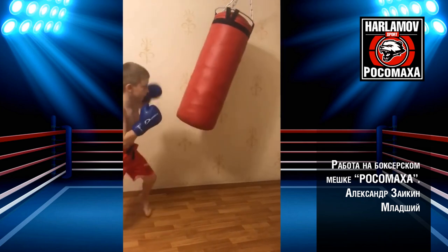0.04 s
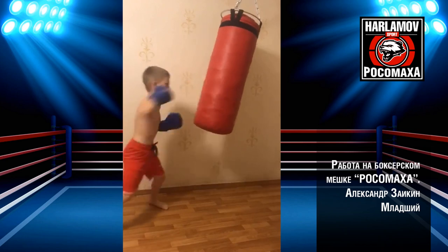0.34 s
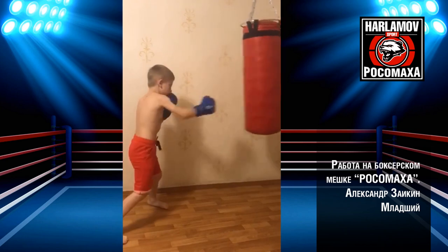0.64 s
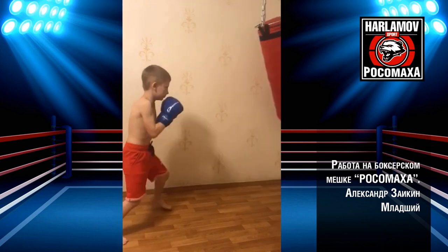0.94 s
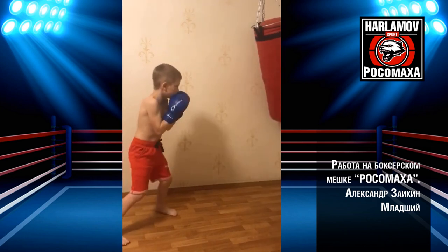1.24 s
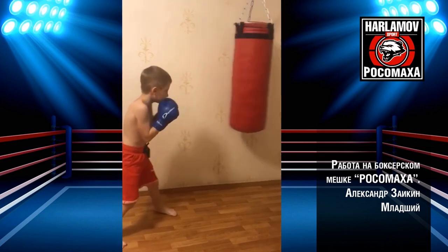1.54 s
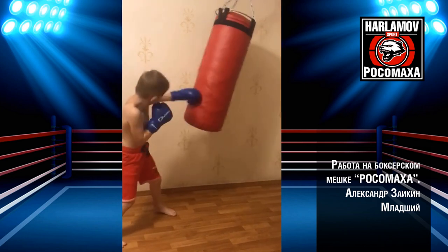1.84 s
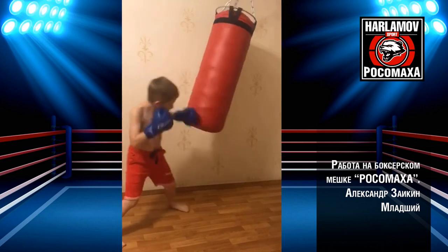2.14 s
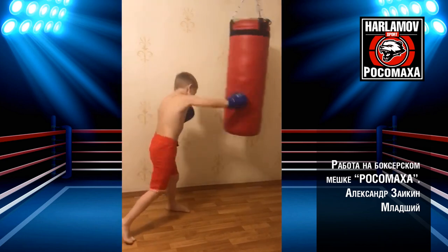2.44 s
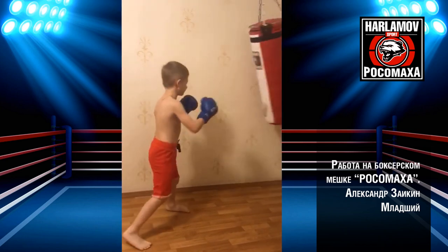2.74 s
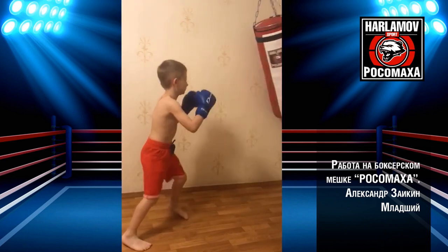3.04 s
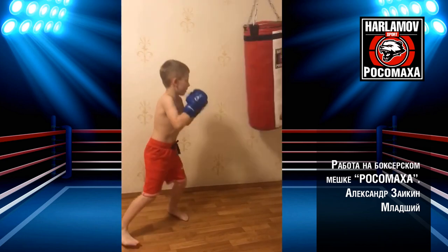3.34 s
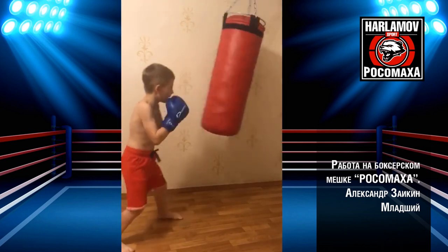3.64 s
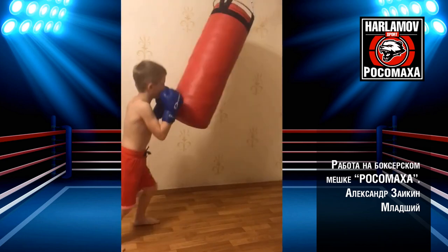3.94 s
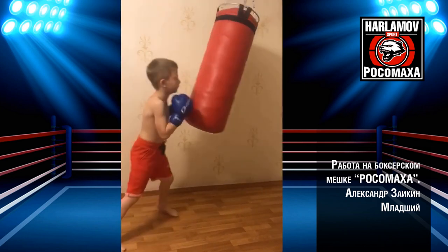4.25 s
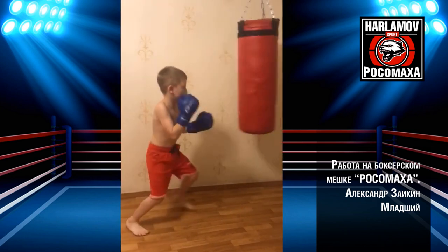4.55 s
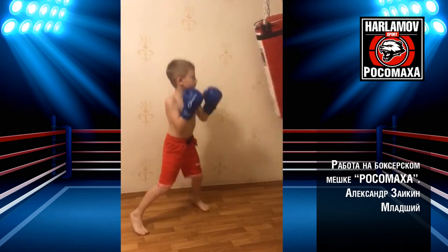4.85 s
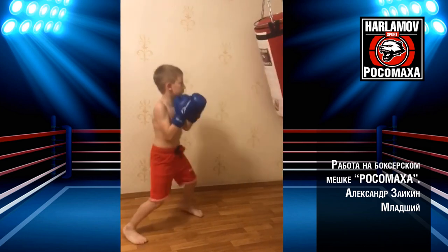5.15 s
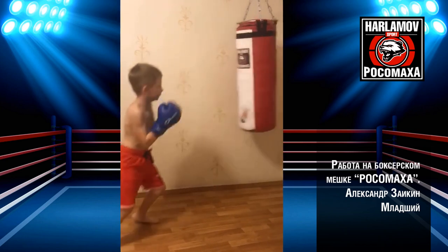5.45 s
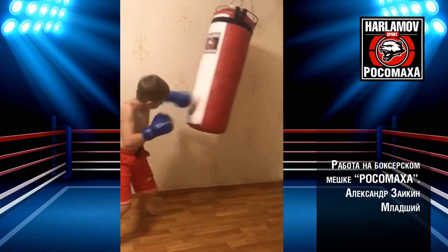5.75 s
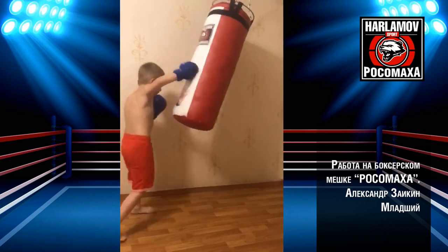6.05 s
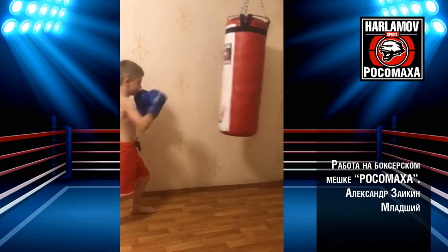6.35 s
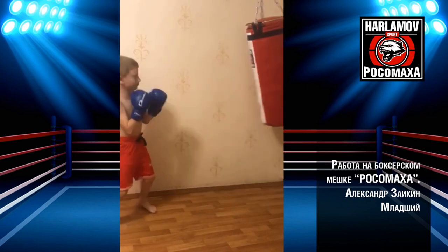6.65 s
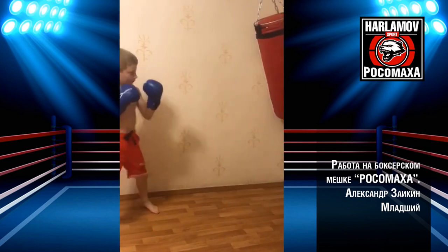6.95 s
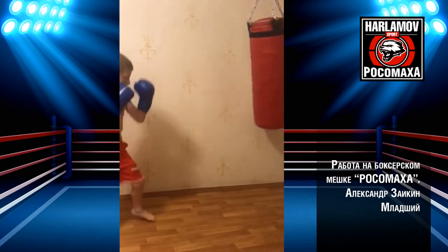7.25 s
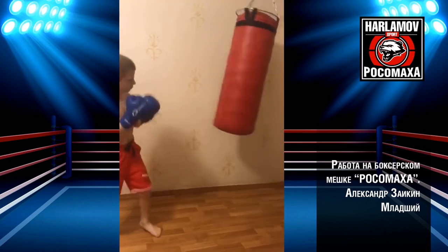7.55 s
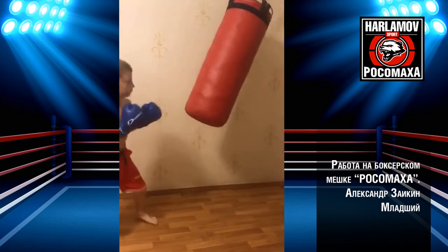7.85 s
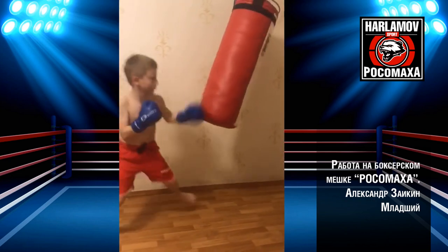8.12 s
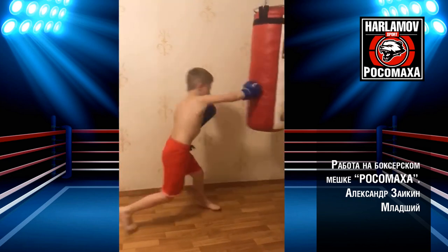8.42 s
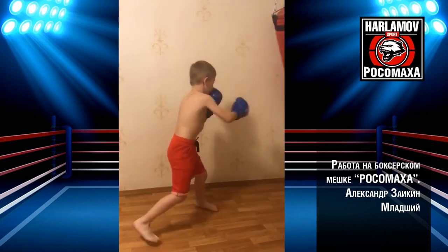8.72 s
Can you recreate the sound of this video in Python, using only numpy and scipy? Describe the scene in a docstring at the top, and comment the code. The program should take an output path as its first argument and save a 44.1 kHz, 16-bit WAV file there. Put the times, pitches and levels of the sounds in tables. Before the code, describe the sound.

A bare foot thuds on a wooden floor, and two boxing glove punches hit a hanging heavy bag at about 0.3 and 0.5 seconds. Each is a crisp vinyl smack with a padded pop and a low thump. After soft steps and scuffs, three more punches land between 1.9 and 2.5 seconds. From about 3 to 5.5 seconds there is quieter footwork: soles thud and slide on the boards, gloves rub the cover, and the hanger lightly ticks and creaks. Two punches land around 6 seconds with a brushing scrape. The heaviest steps begin just after 7 seconds, giving the floor a low boom, and continue around a last pair of punches at about 8.2 and 8.5 seconds. The microphone is a few steps away in a small room with short reverberation and a faint steady hush.

```python
"""Boxing gloves hit a hanging heavy bag in a small room with a wooden floor.
A bare foot lands and two punches follow, then three more: in each the vinyl cracks, the glove padding
pops and a thump swells in the low modes of bag and room. From about 3 s feet thud and slide on the
boards and set the room booming, while gloves rub on the cover and the hanger ticks and creaks.
Two punches land near 6 s; the heaviest steps come after 7 s, and a last pair of punches after 8 s."""
import sys
import numpy as np
from scipy import signal
from scipy.fft import rfft, irfft
from scipy.io import wavfile
from scipy.ndimage import uniform_filter1d

SR = 44100
rng = np.random.default_rng(int(sys.argv[2]) if len(sys.argv) > 2 else 0)


def output_pcm(signal):
    """Save a mono or channel-first signal as 16-bit PCM at the path in sys.argv[1].

    Samples are clipped to [-1, 1] before scaling.
    """
    pcm = np.clip(np.atleast_2d(signal).T, -1, 1) * 32767
    wavfile.write(sys.argv[1], SR, np.round(pcm).astype(np.int16))


N = 387198
AGE = np.arange(int(SR * .7)) / SR  # seconds since the start of one short sound

# Footfalls. Each row: start in seconds, levels of thud, heel knock and room boom in dB,
# decay time of the boards in seconds.
FOOTFALLS = [(0.002, -41.5, -52, -34, .03), (0.378, -52, -37.5, -58, 0.023),
             (0.979, -52.5, -80, -71, 0.045), (1.139, -51.5, -63, -50, .03),
             (1.598, -56, -78, -52.5, 0.051), (2.769, -40.5, -72, -43, 0.035),
             (3.6, -45.5, -62, -49, 0.018), (3.75, -56, -62.5, -68, 0.042),
             (4.05, -41.5, -56, -41.5, 0.028), (4.345, -54, -61, -52.5, 0.047),
             (4.573, -42.5, -54.5, -49, 0.022), (4.74, -36, -45.5, -55, 0.043),
             (5.139, -38, -59, -40.5, 0.04), (5.36, -56, -59, -57, 0.053), (5.512, -41.5, -77, -40, 0.062),
             (6.409, -48, -53, -57, 0.014), (6.746, -56.5, -61, -56, 0.022),
             (7.119, -27, -42.5, -33, 0.032), (7.44, -49.5, -60, -47.5, .035),
             (7.577, -33, -44.5, -44, 0.033), (7.878, -44.5, -52.5, -54, 0.039),
             (8.114, -46, -52, -58, 0.024), (8.241, -26.5, -39.5, -33.5, 0.011),
             (8.348, -26.5, -35.5, -38, 0.021), (8.384, -26, -63, -44, 0.05), (8.642, -27, -50, -35, 0.03)]
# Spectra of cracking vinyl and of high, middle and low friction noise.
# Each row: frequency in Hz, spectral density in dB.
CRACK_SPECTRUM = [(700, -14), (1500, 2), (3000, -2.5), (5000, -7.5), (8000, -8), (10000, -7.5),
                  (12000, -15.5)]
HISS_SPECTRUM = [(2000, -1.5), (4000, 2), (6000, -0.5), (8500, -3.5), (12000, -7)]
SCRAPE_SPECTRUM = [(450, -27.5), (900, -3.5), (1800, -6), (3400, -5), (5500, -10.5)]
RUSTLE_SPECTRUM = [(100, 1), (190, -19), (350, -5), (650, -10.5), (1200, -35)]


def punches(filling_db=-7):
    """Impact excitation: vinyl cracks, air pops out of the glove padding and the filling thumps."""
    # Each row: start in seconds, crack level in dB, its tilt in dB per octave, smack level in dB, pop
    # pitch in Hz, pop and thump levels in dB, crumple time in seconds, crumple in dB relative to the slap.
    blows = [(0.3253, -34.5, 3, -34, 276, -38.5, -35, 0.01, -17),
             (0.5386, -27, 1, -27, 383, -28, -28, 0.0039, -4.5),
             (1.8781, -29.5, -0.5, -28.5, 372, -40.5, -36.5, 0.00073, -7),
             (2.1932, -38.5, 0, -38, 345, -37, -41.5, 0.005, -2.5),
             (2.4654, -26.5, -1, -24.5, 342, -29, -26, 0.0047, -19),
             (5.8738, -30.5, -0.5, -32.5, 277, -35, -34.5, 0.0088, 1),
             (6.0946, -35, -1.5, -33, 277, -25, -34, 0.0097, 31),
             (8.167, -33, 2.5, -34.5, 250.5, -43, -34.5, 0.0045, 0.5),
             (8.5112, -25, 1, -25.5, 383, -35.5, -27.5, 0.0029, -7)]
    # Modes of the padding. Each row: multiple of the pop pitch, level in dB, decay time in seconds.
    glove_modes = [(0.692, -11, 0.0051), (1, 6, 0.0056), (1.4, -13, 0.017)]
    # The smack and the shifting filling. Each row: frequency in Hz, spectral density in dB.
    smack_spectrum = [(200, -1), (400, 3), (800, -1.5), (1500, 0.5), (2500, -38), (5000, -15.5)]
    filling_spectrum = [(35, -1), (60, 8), (110, 0.5), (200, -5.5), (300, -11.5)]
    out = np.zeros(N)
    for start, crack_db, tilt_db, smack_db, pop_hz, pop_db, thump_db, crumple_s, crumple_db in blows:
        slap = contact(crumple_s, crumple_db, wet_db=1.5)
        add_at_level(out, start, crack_db, colour(slap, tilted(CRACK_SPECTRUM, tilt_db)))
        add_at_level(out, start, smack_db, colour(slap, smack_spectrum))
        pop = sum(from_db(db) * np.sin(2 * np.pi * pop_hz * ratio * AGE) * np.exp(-AGE / decay_s)
                  for ratio, db, decay_s in glove_modes)
        add_at_level(out, start, pop_db, through_room(pop, wet_db=0, echo_share=0.17))
        add_at_level(out, start, thump_db, low_modes(swell_s=0.012, lag_s=0.0025))
        filling = colour(diffuse_tail(build_s=0.0064), filling_spectrum)
        add_at_level(out, start, thump_db + filling_db, filling)
    return out


def low_modes(swell_s, lag_s):
    """Modal resonance: bag and room take up a slow push, so their low modes swell after the impact."""
    # Each row: frequency in Hz, level in dB, time to fall 60 dB in seconds.
    modes = [(55.56, 0.5, 0.48), (63.4, -19, 0.9), (88.8, -19.5, 0.64), (124.3, 1, 0.13),
             (137.5, -14.5, 0.4), (165.3, -15, 0.31), (197.1, -20.5, 0.33)]
    t = np.maximum(AGE - lag_s, 0)
    ringing = 0
    for hz, db, t60 in modes:
        gain = from_db(db + rng.normal(0, 1))
        phase = rng.uniform(0, 2 * np.pi)
        ringing += gain * np.sin(2 * np.pi * hz * t + phase) * from_db(-60 * t / t60)
    return unit_peak_rms(ringing * (1 - np.exp(-(t / swell_s) ** 2)))


def footfalls(roll_s=0.0023, damping_s=0.1, rumble_db=-0.5):
    """Impact sound: a heel rolls onto the boards, then body weight drives a boom that the foot damps."""
    # The floor's rumble and the heel's knock. Each row: frequency in Hz, spectral density in dB.
    rumble_spectrum = [(28, -13), (37, 0), (52, 5.5), (75, 3.5), (110, -3.5), (160, -5), (300, -39)]
    knock_spectrum = [(100, -4.5), (170, -14.5), (300, 2.5), (450, -3.5), (700, -19.5), (1500, -30)]
    out = np.zeros(N)
    for start, thud_db, knock_db, boom_db, ring_s in FOOTFALLS:
        add_at_level(out, start, thud_db, floor_boards(ring_s))
        heel = contact(0.0086, crumple_db=-1, wet_db=4) * (1 - np.exp(-AGE / roll_s))
        add_at_level(out, start, knock_db, colour(heel, knock_spectrum))
        rumble = colour(diffuse_tail(build_s=0.0032), rumble_spectrum)
        add_at_level(out, start, thud_db + rumble_db, rumble)
        boom = low_modes(swell_s=0.022, lag_s=0.02514) * np.exp(-AGE / damping_s)
        add_at_level(out, start, boom_db, boom)
    return out


def floor_boards(ring_s, lowest_hz=86.7, glide=0.11, glide_s=0.008, press_s=0.0052):
    """Damped vibration: the boards swing under the foot in three modes, sinking in pitch."""
    # Each row: multiple of the lowest pitch, level in dB, share of the decay time.
    modes = [(1, 4.5, 1), (1.55, -3, 0.58), (2.15, -7.5, 0.5)]
    spot_hz = lowest_hz * (1 + 0.046 * rng.standard_normal())  # each spot has its own pitch
    cycles = spot_hz * (AGE + glide * glide_s * (1 - np.exp(-AGE / glide_s)))
    swing = sum(from_db(db) * np.sin(2 * np.pi * ratio * cycles) * np.exp(-AGE / (ring_s * share))
                for ratio, db, share in modes)
    return swing * (1 - np.exp(-AGE / press_s))


def ticks():
    """Light impacts: straps, hanger and cover tick with too little weight to excite the low modes."""
    # Each row: start in seconds, treble level in dB, its tilt in dB per octave, middle level in dB,
    # contact time in seconds.
    contacts = [(0.382, -40.5, 4.5, -42, 0.003), (2.143, -55.5, -1.5, -69, 0.00095),
                (2.436, -56, -10, -64, 0.0014), (3.262, -44.5, 7.5, -59.5, 0.0016),
                (3.834, -60, 3, -66, 0.0022), (4.026, -55, 2, -61, 0.0032), (4.0507, -51, 7, -48, 0.0034),
                (4.729, -53.5, -3, -65, 0.0018), (5.511, -43, -15, -49, 0.0033),
                (5.58, -50, -15, -43.5, 0.0058), (5.85, -46.5, -10, -53.5, 0.0016),
                (6.05, -47, 5, -45.5, 0.0022), (6.723, -56, 2.5, -62, 0.0034),
                (7.158, -49, 0.5, -48, 0.0028), (7.3134, -54.5, 6, -55, 0.0045),
                (7.574, -43.5, 2, -45, 0.011), (8.116, -47.5, -3.5, -57, 0.0016),
                (8.347, -44.5, 4.5, -44.5, 0.0096), (8.746, -57.5, 5, -48.5, 0.0038)]
    # The two bands of a tick. Each row: frequency in Hz, spectral density in dB.
    treble_spectrum = [(1500, -12), (3500, 9), (6000, 1), (9000, -1.5), (12000, -10.5)]
    middle_spectrum = [(250, 8), (600, 9.5), (1200, 3.5), (2800, 0.5), (5000, -45)]
    out = np.zeros(N)
    for start, treble_db, tilt_db, middle_db, length_s in contacts:
        tick = contact(length_s, crumple_db=5.5, wet_db=-1, echo_share=0.19)
        add_at_level(out, start, treble_db, colour(tick, tilted(treble_spectrum, tilt_db)))
        add_at_level(out, start, middle_db, colour(tick, middle_spectrum))
    return out


def scuffs(rustle_db=-2.5):
    """Sliding friction: noise swells and dies away as a sole or glove brushes past."""
    # Each row: time in seconds, treble level in dB, middle level in dB, swell time in seconds.
    strokes = [(0.03, -61, -54, 0.034), (0.425, -62, -46.5, .028), (0.8948, -57.5, -58, .013),
               (0.9997, -61.5, -61.5, 0.023), (1.1437, -68, -63, 0.021), (1.3, -73, -67, 0.07),
               (1.5844, -61, -59, 0.024), (1.651, -55.5, -66, 0.017), (1.76, -75, -67.5, 0.023),
               (2.07, -76, -67, 0.039), (2.255, -54.5, -54.5, 0.02), (2.39, -57, -58, 0.031),
               (2.79, -64, -87, 0.038), (2.9836, -52.5, -55, 0.015), (3.03, -64, -63.5, 0.021),
               (3.2068, -63.5, -63.5, 0.023), (3.5851, -55.5, -61, 0.022), (3.846, -52.5, -53, .014),
               (3.8794, -54.5, -57.5, 0.011), (3.95, -60, -69, 0.034), (4.0694, -54.5, -55.5, 0.021),
               (4.19, -55.5, -56.5, 0.049), (4.351, -61.5, -62.5, .022), (4.425, -50.5, -54.5, 0.035),
               (4.5997, -58, -60.5, 0.021), (4.7365, -54.5, -54, 0.012), (4.8945, -62, -60, 0.0096),
               (5.0, -61, -68, 0.017), (5.1357, -64, -63, 0.015), (5.268, -75, -57, .017),
               (5.355, -55, -73, 0.025), (5.489, -61, -63, .014), (5.5155, -49.5, -45, 0.014),
               (5.5761, -62, -51, 0.013), (5.985, -42, -49, 0.073), (6.36, -64.5, -70, 0.011),
               (6.4134, -72, -60, 0.015), (6.59, -63, -71, 0.023), (6.79, -71, -62.5, 0.024),
               (6.9423, -59, -61, .014), (7.05, -63.5, -65.5, 0.053), (7.1627, -59, -50, 0.015),
               (7.36, -77, -64, .02), (7.461, -56, -60.5, 0.024), (7.67, -61, -57.5, 0.061),
               (7.8876, -58, -54, 0.022), (8.03, -63.5, -73, 0.032), (8.405, -54.5, -50, 0.025)]
    out = np.zeros(N)
    for time_s, treble_db, middle_db, swell_s in strokes:
        stroke = np.exp(-(AGE / swell_s - 2) ** 2)
        bands = ((treble_db, HISS_SPECTRUM), (middle_db, SCRAPE_SPECTRUM),
                 (middle_db + rustle_db, RUSTLE_SPECTRUM))
        for level_db, spectrum in bands:
            slips = friction(stroke, spread_db=6, wet_db=-1, t60=0.46)
            add_at_level(out, time_s - 1.6 * swell_s, level_db, colour(slips, spectrum))
    return out


def creaks(quality_factor=6):
    """Stick-slip motion: vinyl and hanger each creak in one broad resonance."""
    # Each row: start in seconds, resonance in Hz, level in dB, decay time in seconds.
    chirps = [(0.381, 2200, -35.5, 0.0021), (0.428, 870, -47, 0.054), (4.979, 597, -54, 0.035),
              (5.513, 1960, -49, 0.006), (5.574, 2450, -45, 0.0054), (8.434, 1040, -46, 0.0086),
              (8.741, 1030, -55, 0.011)]
    out = np.zeros(N)
    for start, hz, level_db, decay_s in chirps:
        slips = friction(np.exp(-AGE / decay_s), spread_db=4, wet_db=-5, t60=0.12)
        add_at_level(out, start, level_db, resonance(slips, hz, quality_factor))
    return out


def sole_pressure(average_db=-71.5, follows=0.2, attack_s=0.01, release_s=0.25):
    """Friction grows with load: the envelope of a sole settling, stronger after a heavier step."""
    out = np.zeros(N)
    mean_thud_db = np.mean([step[1] for step in FOOTFALLS])
    settle = (1 - np.exp(-AGE / attack_s)) * np.exp(-AGE / release_s)
    for start, thud_db, *_ in FOOTFALLS:
        level_db = average_db + follows * (thud_db - mean_thud_db)
        add(out, start, from_db(level_db) * settle / settle.max())
    return out


def soles(pressure):
    """Friction noise: bare soles rub on wood in fine slips that follow the pressure."""
    bands = ((-4, HISS_SPECTRUM), (-3, SCRAPE_SPECTRUM), (3, RUSTLE_SPECTRUM))
    return pressure * sum(from_db(db) * colour(grains(N, spread_db=4), spectrum) for db, spectrum in bands)


def crinkles(pressure, per_s=22, spread_db=5, click_db=13.5):
    """Buckling: creases snap over at random moments, louder the harder the soles press."""
    sizes = from_db(spread_db * np.minimum(rng.exponential(1, N), 2))
    signs = rng.choice([-1, 1], N)
    snapping = rng.random(N) < per_s / SR
    clicks = sizes * signs * snapping * from_db(click_db) * pressure
    return through_room(colour(clicks, CRACK_SPECTRUM), wet_db=-12, echo_share=0.37)


def contact(length_s, crumple_db, wet_db, echo_share=1):
    """Impulse excitation: a surface slaps shut, then creases; longer contact fills the room more slowly."""
    crumple = grains(len(AGE), spread_db=4) * np.exp(-AGE / length_s)
    force = from_db(crumple_db) * crumple / np.linalg.norm(crumple)
    force[0] -= 1  # the slap
    early = signal.fftconvolve(force / np.linalg.norm(force), reflections(echo_share))[:len(AGE)]
    return early + from_db(wet_db) * diffuse_tail(build_s=length_s / 2)


def friction(envelope, spread_db, wet_db, t60):
    """Direct and reverberant fields: fine slips, and the smooth wash their energy builds in the room."""
    retained = np.exp(-2 * np.log(1000) / (t60 * SR))  # share of the energy left after one sample
    wash = np.sqrt(signal.lfilter([1 - retained], [1, -retained], envelope ** 2 + 1e-18))
    direct = envelope * grains(len(envelope), spread_db)
    return direct + from_db(wet_db) * wash * rng.standard_normal(len(envelope))


def grains(count, spread_db, grain_samples=16):
    """Amplitude modulation: noise broken into dense slips of log-normal size, with rms 1."""
    noise = rng.standard_normal(count)
    sizes = from_db(spread_db * rng.standard_normal(count // grain_samples + 1))
    slips = noise * np.repeat(sizes, grain_samples)[:count]
    return slips / slips.std()


def through_room(x, wet_db, echo_share):
    """Convolution: a sound takes on the impulse response from its spot to the microphone."""
    response = reflections(echo_share) + from_db(wet_db) * diffuse_tail(build_s=0.0011)
    return signal.fftconvolve(x, response)[:len(x)]


def reflections(echo_share):
    """Early reflection: floor and walls echo the direct sound, with different delays for every spot."""
    # Each row: delay in seconds, gain.
    echoes = [(.0026, 0.81), (.0047, 0.51), (0.013, .25)]
    response = np.zeros(len(AGE))
    response[0] = 1
    for delay_s, gain in echoes:
        response[int(delay_s * rng.uniform(.88, 1.12) * SR)] += gain * echo_share
    return response


def diffuse_tail(build_s, late_db=-23, late_t60=1.0):
    """Reverberation: a noise tail of unit energy builds up, then decays band by band."""
    # Each row: frequency in Hz, time to fall 60 dB in seconds.
    decay_times = [(100, 0.46), (350, 0.27), (1000, 0.25), (3000, 0.25), (7000, 0.3), (12000, 0.17)]
    edges_hz = np.geomspace(50, 14000, 9)
    late_decay = from_db(late_db - 60 * AGE / late_t60)
    tail = 0
    for low, high in zip(edges_hz, edges_hz[1:]):
        bandpass = signal.butter(2, [low, high], "band", fs=SR, output="sos")
        band = signal.sosfilt(bandpass, rng.standard_normal(len(AGE)))
        decay = from_db(-60 * AGE / at_hz(decay_times, np.sqrt(low * high)))
        tail += band * (decay + late_decay)
    tail *= 1 - np.exp(-AGE / build_s)
    return tail / np.linalg.norm(tail)


def at_microphone(x):
    """Interference: standing waves lift some pitches and sink others; the wall behind adds faint echoes."""
    # Each row: frequency in Hz, bandwidth in Hz, gain in dB.
    standing_waves = [(261, 27, 1.5), (201.7, 8.4, 3), (834, 23, -0.5), (374.7, 15, 3.5), (472.7, 40, -11),
                      (607.5, 40, 6), (873, 46, 6), (1086, 71, 4.5), (1640, 84, 1.5), (4923, 730, -4)]
    # Each row: delay in seconds, gain.
    wall_echoes = [(.0041, 0.21), (.0083, 0.055), (0.0135, -0.099), (.019, 0.067)]
    for hz, width_hz, db in standing_waves:
        x = x + (from_db(db) - 1) * resonance(x, hz, hz / width_hz)
    out = x.copy()
    for delay_s, gain in wall_echoes:
        add(out, delay_s, gain * x)
    return out


def room_tone(level_db=-65):
    """Stationary noise: the steady hush and rumble of the room."""
    # Each row: frequency in Hz, spectral density in dB.
    hush_spectrum = [(30, 1), (55, -4.5), (90, 1), (173, -12.5), (400, -9), (700, -17.5), (1800, -22),
                     (3600, -22.5), (7000, -27.5), (11500, -31)]
    return from_db(level_db) * colour(rng.standard_normal(N), hush_spectrum)


def colour(x, spectrum, size=8192, skirt_db_per_octave=18):
    """Minimum-phase filtering: a causal response of unit energy that falls away beyond the table."""
    hz = np.maximum(np.arange(size // 2 + 1) * SR / size, 4)
    octaves_outside = np.abs(np.log2(hz / np.clip(hz, spectrum[0][0], spectrum[-1][0])))
    gain = from_db(at_hz(spectrum, hz) - skirt_db_per_octave * octaves_outside)
    cepstrum = irfft(np.log(gain))
    cepstrum[1:size // 2] *= 2  # folding onto positive time gives minimum phase
    cepstrum[size // 2 + 1:] = 0
    response = irfft(np.exp(rfft(cepstrum)))
    return signal.fftconvolve(x, response / np.linalg.norm(response))[:len(x)]


def resonance(x, hz, quality_factor):
    """Second-order resonance: passes a band of width hz / quality_factor."""
    return signal.lfilter(*signal.iirpeak(hz, quality_factor, fs=SR), x)


def tilted(spectrum, db_per_octave):
    """Spectral tilt: the same spectrum, brighter or duller."""
    return [(hz, db + db_per_octave * np.log2(hz / spectrum[0][0])) for hz, db in spectrum]


def at_hz(points, hz):
    """Interpolation of a table on a log-frequency axis."""
    frequencies, values = np.transpose(points)
    return np.interp(np.log(hz), np.log(frequencies), values)


def from_db(db):
    """Decibels as an amplitude ratio."""
    return 10 ** (np.asarray(db) / 20)


def unit_peak_rms(x):
    """Normalisation: the loudest 10 ms get rms 1."""
    return x / np.sqrt(uniform_filter1d(x * x, SR // 100).max() + 1e-20)


def add(track, start_s, sound):
    """Superposition: a sound joins the track at a given time."""
    i = int(start_s * SR)
    sound, i = sound[max(-i, 0):], max(i, 0)
    track[i:i + len(sound)] += sound[:N - i]


def add_at_level(track, start_s, level_db, sound):
    """Superposition with the sound's loudest 10 ms set to a given level."""
    add(track, start_s, from_db(level_db) * unit_peak_rms(sound))


def scene():
    """Superposition: all sources sum at one microphone a few steps away."""
    pressure = sole_pressure()
    small_sounds = ticks() + scuffs() + creaks() + soles(pressure) + crinkles(pressure)
    return at_microphone(punches() + footfalls() + small_sounds + room_tone())[None]


def record(dry, low_hz=24, high_hz=12000):
    """Band limiting: the microphone loses the deepest bass, and the top is cut steeply."""
    highpass = signal.butter(4, low_hz, "high", fs=SR, output="sos")
    lowpass = signal.ellip(10, .2, 70, high_hz, fs=SR, output="sos")
    return signal.sosfilt(lowpass, signal.sosfilt(highpass, dry))


dry = scene()
out = record(dry)
output_pcm(out)
```